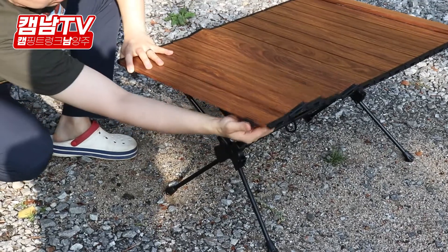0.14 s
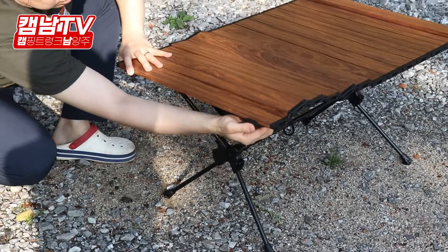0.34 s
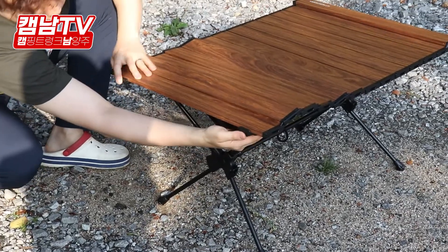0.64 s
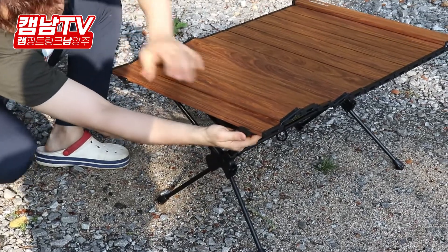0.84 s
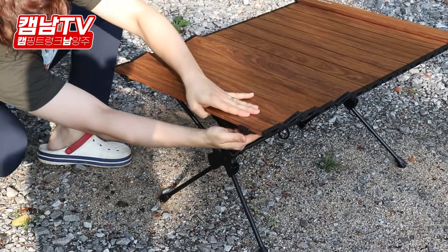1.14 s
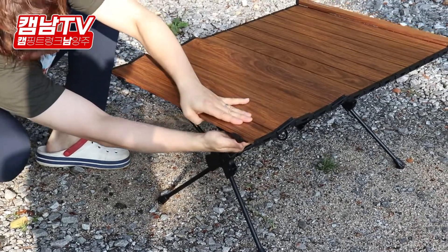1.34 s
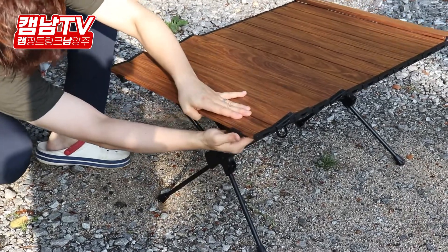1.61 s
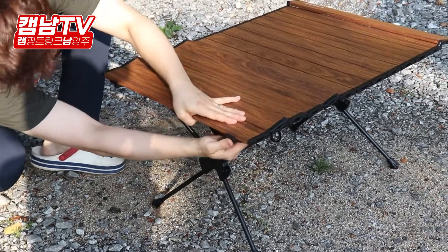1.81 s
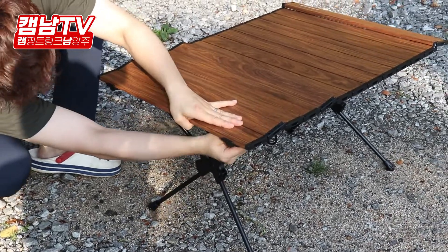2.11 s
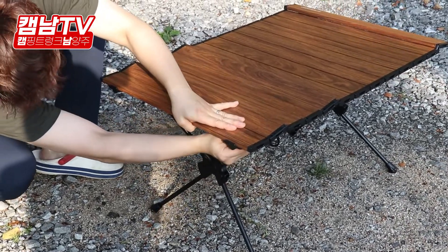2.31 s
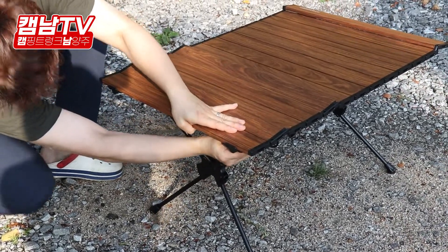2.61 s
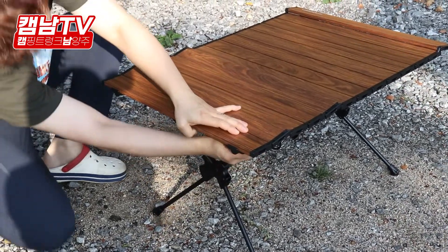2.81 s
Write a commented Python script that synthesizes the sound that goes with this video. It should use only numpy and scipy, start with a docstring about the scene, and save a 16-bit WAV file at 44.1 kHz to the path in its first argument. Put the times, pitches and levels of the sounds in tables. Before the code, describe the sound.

Aluminium slats knock and clatter as a roll-up tabletop is pressed into its frame. A loud opening cluster is followed by two smaller snaps, faint rubbing and light clicks. Gravel crunches softly while low wind buffets the microphone.

```python
"""Aluminium slats knock, chatter and ring as a roll-up tabletop is pressed into its frame outdoors.
Each knock excites the modes of the slats; one edge squeaks, a few slats snap home, and between
knocks they rub and a palm brushes over them. Small dry clicks and a crunch of gravel under a shoe
stand out towards the end, over low wind on the microphone and a steady outdoor hiss."""
import sys
import numpy as np
from scipy import signal
from scipy.fft import rfft, irfft
from scipy.io import wavfile
from scipy.ndimage import uniform_filter1d

SR = 44100
rng = np.random.default_rng(int(sys.argv[2]) if len(sys.argv) > 2 else 0)


def transcribe(signal):
    """Save signal, clipped to [-1, 1], as a 16-bit WAV file at the path in sys.argv[1]."""
    frames = np.atleast_2d(signal).T
    limited = np.clip(frames, -1, 1)
    pcm = np.round(limited * 32767).astype(np.int16)
    wavfile.write(sys.argv[1], SR, pcm)


N = 130095


# (time [s], unused, thud [dB], body [dB], clack [dB], tick [dB], resonance [Hz], chatter [s])
KNOCKS = [(0.205, -8, -23.5, -20.5, -28, -42.5, 1140, 0.0063),
          (0.257, -4, -28, -23, -19.5, -35, 2080, 0.0022), (0.307, -2, -27, -20, -18, -35.5, 1140, 0.0054),
          (0.343, -16, -48, -29.5, -32, -40, 1350, 0.0099),
          (0.37, -17, -35.5, -28.5, -34, -49, 1120, 0.005),
          (0.408, -21, -39.5, -33.5, -41, -63, 1090, 0.0059),
          (0.484, -28, -38, -33, -42, -73, 1500, 0.0035), (0.502, -29, -49, -34, -38, -49, 1190, 0.0062),
          (0.598, -28, -48, -41.5, -63, -60, 1215, 0.0069),
          (0.656, -26, -44, -42.5, -62, -53, 1240, 0.0026), (0.67, -23, -37, -55, -52, -54, 1170, 0.0027),
          (0.696, -7, -46, -41, -46.5, -54, 1250, 0.005),
          (1.078, -18, -40.5, -36.5, -47, -52, 1210, 0.0042),
          (1.103, -10, -30.5, -26.5, -27, -33, 1780, 0.0056),
          (1.131, -21, -64, -39, -41.5, -62, 1130, 0.0026), (1.171, -22, -53, -37, -46, -52, 1290, 0.0075),
          (1.188, -24, -51, -39.5, -47, -64, 1360, 0.0037),
          (1.318, -27, -60, -40.5, -49, -66, 1420, 0.0038), (1.338, -22, -47, -46, -55, -57, 1230, 0.0082),
          (1.355, -14, -34, -29, -32, -39.5, 930, 0.0036),
          (1.369, -14, -29.5, -38, -33.5, -52, 880, 0.0024),
          (1.401, -16, -34.5, -34.5, -27, -34, 2070, 0.0056),
          (1.429, -13, -35, -32, -29.5, -41, 1440, 0.0022), (1.595, -24, -32, -52, -46, -59, 900, 0.0068),
          (1.618, -23, -42.5, -36, -44, -56, 950, 0.0043), (1.695, -31, -49, -43.5, -51, -55, 845, 0.0047),
          (1.976, -21, -40.5, -39, -37, -47, 875, 0.0023), (2.149, -33, -45, -52, -49, -57, 1150, 0.0045),
          (2.247, -29, -50, -46, -49, -58, 1130, 0.0044), (2.412, -27, -53, -48.5, -53, -66, 912, 0.005),
          (2.465, -30, -45, -42, -51.5, -69, 880, 0.0032), (2.621, -29, -55, -41, -49, -57, 1130, 0.0055)]
# (thud/body [Hz], body/clack [Hz], clack/tick [Hz])
CROSSOVERS_HZ = [615, 1620, 4970]
# added to every knock (thud [dB], body [dB], clack [dB], tick [dB])
BAND_TRIM_DB = [1, -0.5, 1.5, -1]
CONTACTS_PER_S, CONTACT_DB = 2000, -13.5
FOCUS_DB, FOCUS_WIDTH_HZ = -5, 200

def knocks(modes, size=1500):
    """A contact and a short chatter strike the slats; each knock has its own resonance and band levels."""
    out, t = np.zeros(N), np.arange(size) / SR
    low, mid, high = CROSSOVERS_HZ
    bands = [signal.butter(4, hz, kind, fs=SR, output="sos") for hz, kind in
             [(low, "low"), ([low, mid], "band"), ([mid, high], "band"), (high, "high")]]
    for s, _, *band_db, focus_hz, chatter_s in KNOCKS:
        contacts = amp(CONTACT_DB) * rng.standard_normal(size) * (rng.random(size) < CONTACTS_PER_S / SR)
        contacts *= np.exp(-(t / chatter_s) ** 2)
        contacts[0] = 1  # main impact
        sound = signal.fftconvolve(spot_response(*modes), contacts)
        focus = signal.iirpeak(focus_hz, focus_hz / FOCUS_WIDTH_HZ, SR)
        sound = sound + amp(FOCUS_DB) * signal.lfilter(*focus, sound)
        for band, db, trim_db in zip(bands, band_db, BAND_TRIM_DB):
            part = signal.sosfilt(band, sound)
            add(out, s, amp(db + trim_db) * part / peak_rms(part, size=500))
    return out


# ringing modes (frequency [Hz], relative level [dB], T60 [s])
RING_MODES = [(231.5, -1.5, 0.35), (584.7, -5.5, 0.54), (612, -2.5, 0.19), (912, 8, 0.27), (1130, -19, .42),
              (1118, -17, 0.088), (1180, 6, 0.3), (1248, 10.5, 0.22), (1300, -14, .42), (1322, -6, 0.56),
              (1825, -35, .33), (1997, 7, 0.067), (2294, -9, 0.12), (2840, -6.5, .22)]
# spectrum of the damped modes (frequency [Hz], density [dB])
CROWD_SPECTRUM = [(120, -46), (230, 0.5), (290, -13.5), (400, -4), (700, -2), (1100, 14), (1550, 2),
                  (2000, 1), (3100, -8.5), (4000, -17), (5200, -16.5), (5800, -32.5), (6700, -22.5),
                  (8000, -51.5), (9800, -43), (11500, -36.5), (16000, -48)]
CROWD_T60_1KHZ_S, CROWD_EXPONENT = 0.12, 0.07
LINGER_DB, LINGER_T60_1KHZ_S, LINGER_EXPONENT = -12, 0.35, 0.24

def slat_modes(count=700, size=18000):
    """Free decays of the slats: a crowd of modes that drop fast and linger faintly, and a few that ring."""
    t = np.arange(size) / SR
    jitter, phase = rng.random((2, count))
    hz = np.linspace(np.sqrt(150), np.sqrt(16000), count) ** 2
    hz += (jitter - .5) * np.gradient(hz)
    gain = spectrum(CROWD_SPECTRUM, hz) * np.sqrt(np.gradient(hz))
    hz, gain, phase = hz[:, None], gain[:, None], phase[:, None]
    drop = decay(t, CROWD_T60_1KHZ_S / (hz / 1000) ** CROWD_EXPONENT)
    linger = amp(LINGER_DB) * decay(t, LINGER_T60_1KHZ_S / (hz / 1000) ** LINGER_EXPONENT)
    crowd = gain * (drop + linger) * np.sin(2 * np.pi * (hz * t + phase))
    ring = np.array([amp(db) * decay(t, t60) * np.sin(2 * np.pi * f * t) for f, db, t60 in RING_MODES])
    return crowd, ring


def spot_response(crowd, ring, ring_db=-5.5, scatter_db=3.5, rise_s=0.00039):
    """Impulse response at one spot of the slats: each spot weights the modes differently."""
    dense = rng.choice([-1, 1], len(crowd)) @ crowd
    weights = rng.choice([-1, 1], len(ring)) * amp(scatter_db * rng.standard_normal(len(ring)))
    attack = 1 - np.exp(-np.arange(len(dense)) / SR / rise_s)
    return attack * (unit(dense) + amp(ring_db) * unit(weights @ ring))


# (time [s], crack [dB], crack pitch [Hz], edge re body [dB], thump [dB], thump pitch [Hz])
SNAPS = [(0.2604, -18, 2150, -24, -28, 420), (0.3091, -13, 2880, -14, -23, 375),
         (1.109, -25.5, 2460, -18, -41, 385), (1.4066, -24.5, 2300, -24, -36.5, 400)]

def snaps(size=3000, thump_rise_s=0.001):
    """A slat snaps home: a sharp crack of its edge and a short hollow thump of the frame."""
    out, t = np.zeros(N), np.arange(size) / SR
    thump_envelope = (1 - np.exp(-t / thump_rise_s)) * decay(t, t60_s=0.028)
    for s, crack_db, crack_hz, edge_db, thump_db, thump_hz in SNAPS:
        body = unit(resonant_noise(size, crack_hz, relative_width=0.23))
        edge = amp(edge_db) * unit(bright_edge(size))
        crack = (body + edge) * decay(t, t60_s=0.024)
        thump = thump_envelope * np.sin(2 * np.pi * thump_hz * t)
        add(out, s, amp(crack_db) * crack / peak_rms(crack, size=130))
        add(out, s, amp(thump_db) * thump / peak_rms(thump, size=400))
    return out


# (frequency [Hz], density [dB])
EDGE_SPECTRUM = [(200, 23), (1000, 3), (4000, 5), (6800, 5), (8200, -5), (12000, -22), (16000, -13)]

def bright_edge(size):
    """Broadband noise of a hard contact, for snaps and clicks."""
    return colour(rng.standard_normal(size), EDGE_SPECTRUM)


def squeak(start_s=0.206, length_s=0.0205, level_db=-17, from_hz=1070, to_hz=1148, roughness=0.13):
    """A slat edge sticks and slips as it first gives way, rising a little in pitch."""
    out, size = np.zeros(N), round(length_s * SR)
    cycles = np.cumsum(np.linspace(from_hz, to_hz, size)) / SR
    flutter = unit(signal.fftconvolve(rng.standard_normal(N), np.hanning(70), "same"))[:size]
    envelope = signal.windows.tukey(size, .5) * (1 + roughness * flutter)
    add(out, start_s, amp(level_db) * unit(envelope * np.sin(2 * np.pi * cycles)))
    return out


# (time [s], level [dB])
RUB_LEVEL = [(0, -50), (.3, -61), (.45, -50), (.56, -52), (.69, -44.5), (.8, -66), (1.05, -52),
             (1.2, -40.5), (1.29, -83), (1.39, -25), (1.5, -58), (1.66, -38.5), (1.78, -79), (1.95, -43),
             (2.07, -56), (2.18, -49), (2.32, -58), (2.95, -57)]
# (frequency [Hz], gain [dB])
SLIP_SPECTRUM = [(200, -4), (600, 0), (850, 0.5), (1100, -5.5), (1400, 3.5), (1700, -3), (2400, -1),
                 (8000, 4.5)]

def rubbing(modes):
    """Sliding edges feed tiny slips into the modes of the slats."""
    slips = colour(grains(per_s=580, spread_db=4.5), SLIP_SPECTRUM)
    return level(RUB_LEVEL) * unit(signal.fftconvolve(slips, spot_response(*modes))[:N])


# (time [s], body [dB], pitch [Hz], edge re body [dB])
CLICKS = [(0.184, -47, 2600, -5), (0.646, -46, 5000, -8), (.743, -42.5, 2400, 0), (1.047, -36.5, 2310, 0.5),
          (1.433, -35, 6260, -10), (1.464, -43, 6600, -8), (1.62, -46, 3540, 5), (2.051, -47, 6200, 4),
          (2.091, -27, 2540, -8.5), (2.096, -34, 2480, 1), (2.344, -42, 2340, -4),
          (2.687, -28.5, 1930, -14), (2.697, -41.5, 5970, 6), (2.712, -41, 3800, -5),
          (2.726, -40, 1990, -7), (2.763, -34.5, 2400, -20), (2.768, -29.5, 2050, -29),
          (2.793, -41.5, 4430, -4), (2.937, -33.5, 2470, -9)]

def clicks(size=4000, tail_db=-21):
    """Small hard things snap together: one broad resonance and a bright edge, with a faint tail."""
    out, t = np.zeros(N), np.arange(size) / SR
    envelope = decay(t, t60_s=0.012) + amp(tail_db) * decay(t, t60_s=0.21)
    for s, db, hz, edge_db in CLICKS:
        body = envelope * resonant_noise(size, hz, relative_width=0.2)
        edge = envelope * bright_edge(size)
        click = body / peak_rms(body, size=100) + amp(edge_db) * edge / peak_rms(edge, size=100)
        add(out, s, amp(db) * click)
    return out


# (time [s], level [dB])
BRUSH_LEVEL = [(0, -65), (.84, -76), (.9, -55.5), (.95, -53), (1.0, -72), (1.06, -68), (1.09, -56),
               (1.15, -63), (1.2, -74), (2.95, -67)]
# (frequency [Hz], density [dB])
BRUSH_SPECTRUM = [(1000, -23), (4000, 3), (7000, 1), (12000, 0), (16000, -3)]

def palm_brush():
    """Skin slides on the smooth slats with a faint grainy hiss."""
    return level(BRUSH_LEVEL) * unit(colour(grains(per_s=1700, spread_db=5), BRUSH_SPECTRUM))


# (time [s], level [dB])
GRAVEL_LEVEL = [(0, -47), (2.6, -50), (2.63, -46), (2.68, -41), (2.745, -47), (2.79, -42), (2.86, -45.5),
                (2.95, -39.5)]
# (frequency [Hz], density [dB])
GRAVEL_SPECTRUM = [(200, -20), (500, 2.5), (1100, -0.5), (2100, 1), (3200, -4.5), (6700, -11), (8200, -18),
                   (15500, -21)]

def gravel():
    """Stones grind under a shifting shoe."""
    return level(GRAVEL_LEVEL) * unit(colour(grains(per_s=1700, spread_db=0.5), GRAVEL_SPECTRUM))


# (time [s], rumble before trim [dB], buffeting [dB])
GUSTS = [(0.0, -22.5, -28), (0.11, -19.5, -36.5), (0.14, -28.5, -44), (0.21, -28, -31.5), (0.32, -33, -40),
         (0.41, -19, -29.5), (0.65, -31, -38), (0.68, -25.5, -33.5), (1.22, -38, -49), (1.77, -27, -39),
         (2.31, -31.5, -37.5), (2.46, -23.5, -34), (2.5, -29.5, -39), (2.55, -17.5, -42),
         (2.62, -20.5, -37), (2.69, -34.5, -33), (2.91, -20.5, -37.5), (2.95, -20.5, -31)]
# (frequency [Hz], density [dB])
RUMBLE_SPECTRUM = [(5, 2), (15, 0), (25, 3.5), (40, -5), (60, -4.5), (90, -23), (150, -37.5), (400, -93)]
# (frequency [Hz], density [dB])
BUFFET_SPECTRUM = [(40, -55), (85, 5), (130, -1), (180, -5), (230, -7), (290, -16), (500, -25),
                   (1200, -90.5)]

def wind(rumble_trim_db=2.5):
    """Gusts rumble and buffet on the microphone."""
    rumble = amp(rumble_trim_db) * level(GUSTS, column=1) * eddies(RUMBLE_SPECTRUM)
    buffeting = level(GUSTS, column=2) * eddies(BUFFET_SPECTRUM)
    return rumble + buffeting


def eddies(points, size=5000):
    """Turbulent noise of even strength."""
    noise = colour(rng.standard_normal(N), points)
    power = uniform_filter1d(uniform_filter1d(noise ** 2, size), size)
    return noise / np.sqrt(power + 1e-20)


# (frequency [Hz], density [dB])
HISS_SPECTRUM = [(120, 0), (200, 1), (527, -11), (567, 2), (610, -8), (912, -17), (1080, -8), (1410, -43.5),
                 (2280, -15), (2830, -56.5), (3400, -20.5), (15800, -35.5)]

def outdoor_hiss(level_db=-49):
    """Steady noise of the open air."""
    return amp(level_db) * unit(colour(rng.standard_normal(N), HISS_SPECTRUM))


def grains(per_s, spread_db):
    """Random tiny impacts of uneven size."""
    strength = amp(spread_db * np.minimum(rng.exponential(1, N), 4.5))
    return strength * rng.choice([-1, 1], N) * (rng.random(N) < per_s / SR)


def resonant_noise(size, hz, relative_width):
    """Noise through one broad resonance."""
    f = np.fft.rfftfreq(size, 1 / SR) + 1
    detuning = (f / hz - hz / f) / (2 * relative_width)
    return irfft(rfft(rng.standard_normal(size)) / (1 + detuning ** 2))


def amp(db):
    """Decibels to gain."""
    return 10 ** (np.asarray(db) / 20)


def decay(t, t60_s):
    """Falls 60 dB in t60_s."""
    return amp(-60 * t / t60_s)


def unit(x):
    """Scales to an rms of 1."""
    return x / np.sqrt(np.mean(x ** 2) + 1e-20)


def peak_rms(x, size):
    """Rms of the strongest stretch of size samples."""
    return np.sqrt(uniform_filter1d(x ** 2, size, mode="constant").max() + 1e-20)


def spectrum(points, hz):
    """Gain of a (frequency [Hz], level [dB]) table at hz."""
    f, db = np.transpose(points)
    return amp(np.interp(np.log(hz + 1), np.log(f + 1), db))


def colour(x, points):
    """Filters by a (frequency [Hz], level [dB]) table."""
    return irfft(rfft(x) * spectrum(points, np.fft.rfftfreq(len(x), 1 / SR)), len(x))


def level(rows, column=1):
    """Gain over time from a (time [s], level [dB], ...) table."""
    rows = np.array(rows)
    return amp(np.interp(np.arange(N) / SR, rows[:, 0], rows[:, column]))


def add(mix, s, sound):
    """Mixes a sound in at s seconds."""
    part = mix[round(s * SR):][:len(sound)]
    part += sound[:len(part)]


def scene():
    """Tabletop, hand, ground and wind, in mono."""
    modes = slat_modes()
    tabletop = knocks(modes) + squeak() + rubbing(modes) + snaps()
    return (tabletop + clicks() + palm_brush() + gravel() + wind() + outdoor_hiss())[None]


def record(dry):
    """Steep low-pass at 15.9 kHz."""
    lowpass = signal.firwin(401, 15900, window=("kaiser", 9), fs=SR)
    return signal.oaconvolve(dry, lowpass[None], "same")


dry = scene()
out = record(dry)
transcribe(out)
```